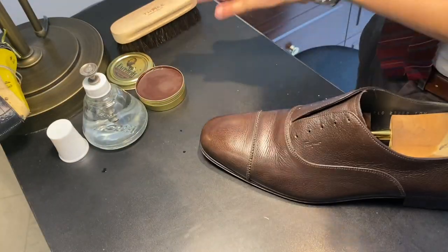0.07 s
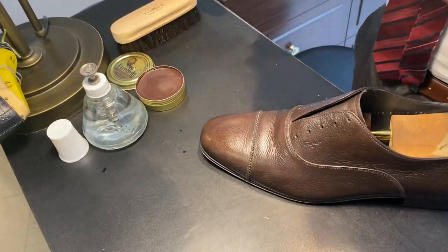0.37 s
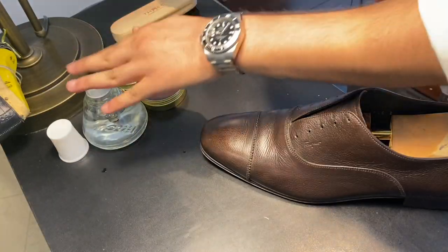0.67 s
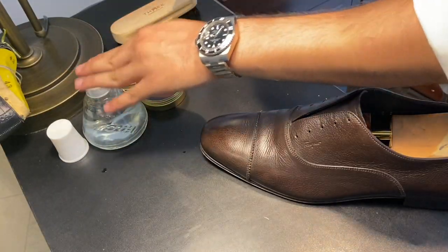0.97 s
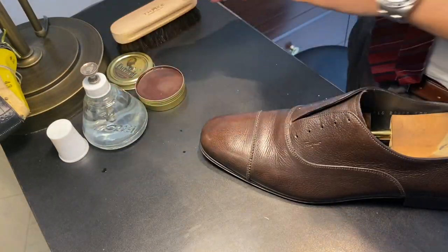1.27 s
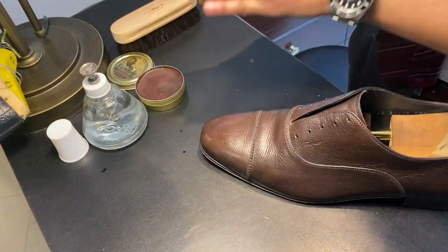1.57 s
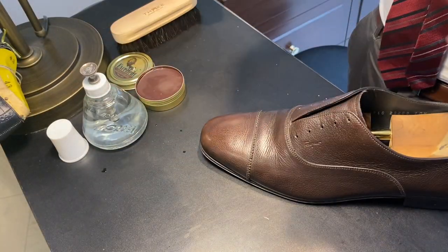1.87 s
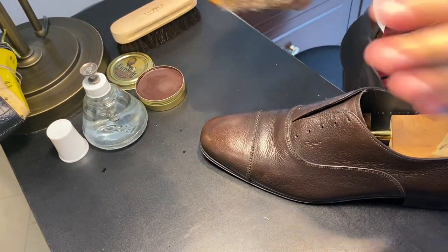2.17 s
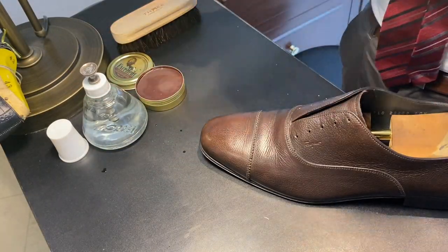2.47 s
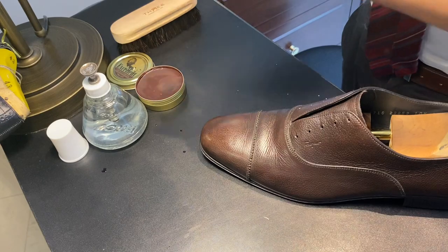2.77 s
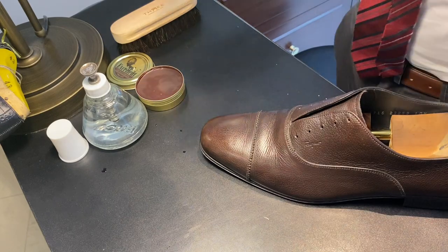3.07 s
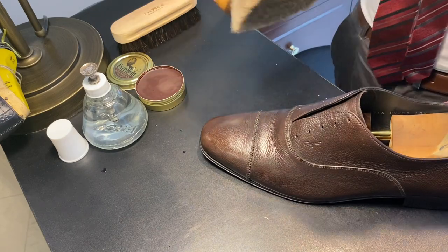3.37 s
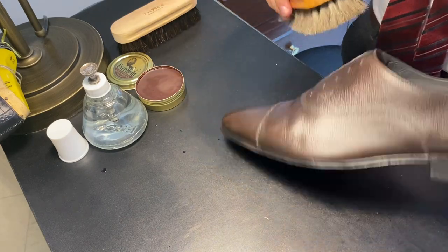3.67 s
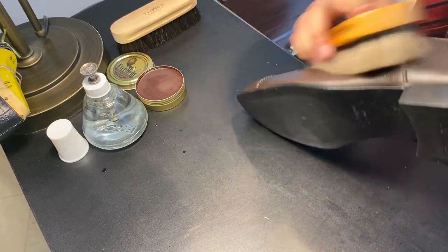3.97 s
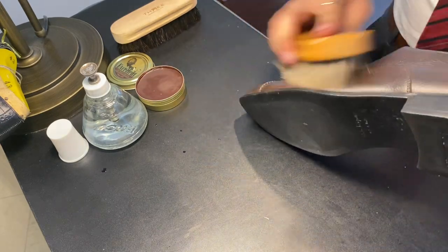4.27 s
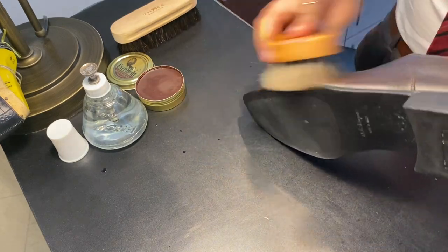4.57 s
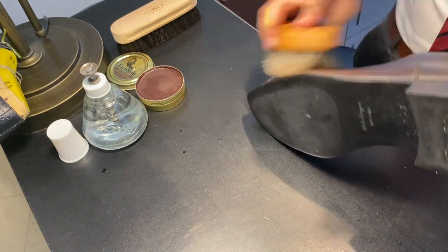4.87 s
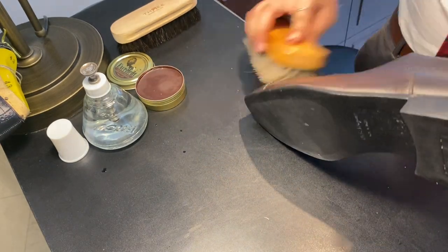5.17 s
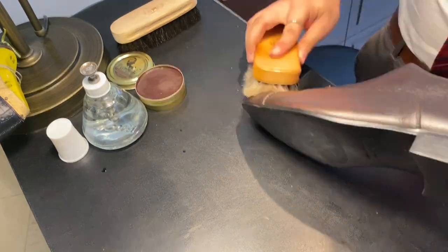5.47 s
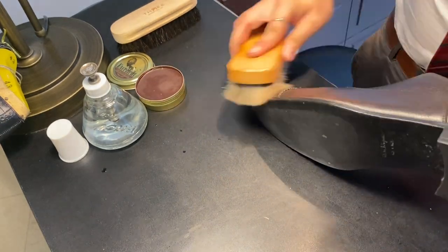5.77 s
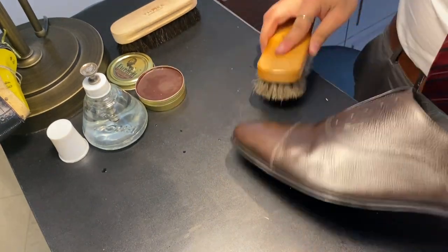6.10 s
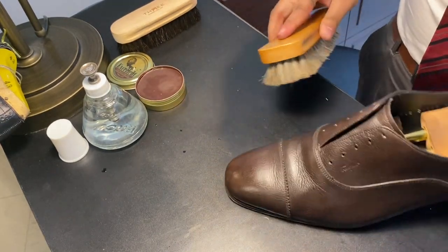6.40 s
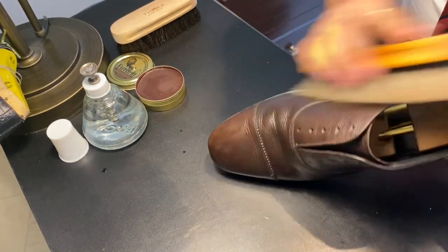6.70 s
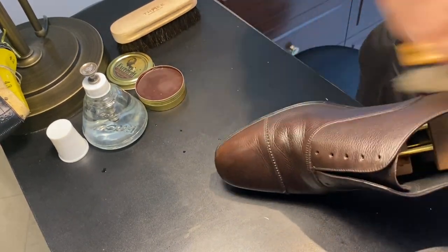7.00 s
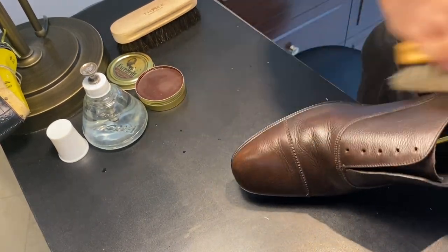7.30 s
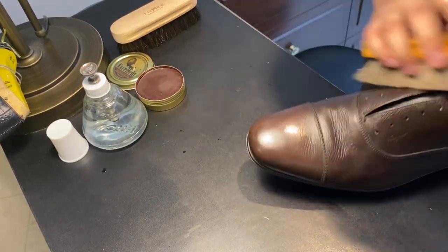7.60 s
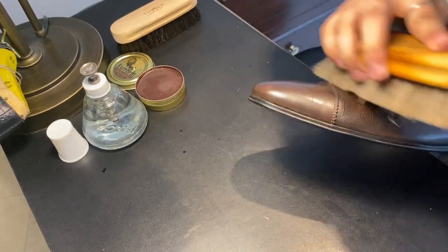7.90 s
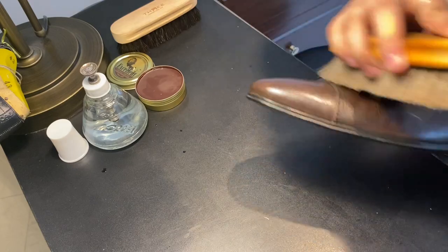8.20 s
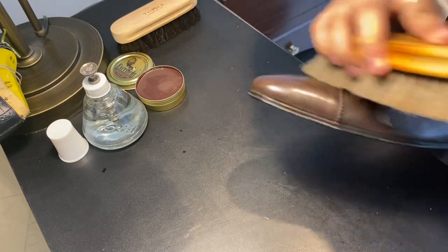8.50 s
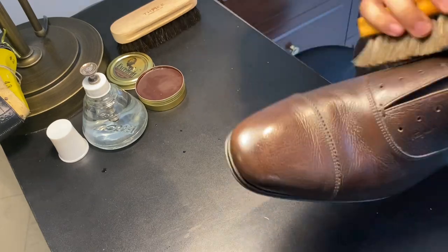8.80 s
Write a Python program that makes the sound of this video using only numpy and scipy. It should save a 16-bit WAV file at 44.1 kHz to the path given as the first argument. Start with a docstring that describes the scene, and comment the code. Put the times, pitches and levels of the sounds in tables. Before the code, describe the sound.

Over a low ventilation hum in a small shop, fingers faintly wipe bristles and a glass pump bottle ticks, clacks and gives one tiny squirt. Something hard slides softly and a wooden brush handle clacks. Then the brush sweeps quickly to and fro over a leather shoe, hissing and bumping hollowly. The shoe knocks down on the table and a second bout of brushing follows, all close to the microphone.

```python
"""A leather shoe is polished at a work table in a small humming shop, close to a two-port microphone.
Fingers wipe a bristle brush, a glass pump bottle ticks and squirts once, and the water is wiped in.
Something hard slides and rings as the brush is fetched, and its wooden handle clacks. From 4 s the
brush sweeps to and fro, six or seven strokes a second, hissing on the leather and bumping the hollow
shoe. Near 6.5 s the shoe is set down and turned; a second bout works over the vamp and the toe cap."""
import sys
import numpy as np
from scipy import signal
from scipy.fft import rfft, irfft, next_fast_len
from scipy.io import wavfile
from scipy.ndimage import uniform_filter1d, map_coordinates

SR = 44100
rng = np.random.default_rng(int(sys.argv[2]) if len(sys.argv) > 2 else 0)


def materialize(psi):
    """Save the field psi as 16-bit PCM at rate SR to the path in sys.argv[1].

    A 1-D psi becomes a single channel; in a 2-D psi each row is a channel.
    """
    bounded = np.clip(np.atleast_2d(psi).T, -1, 1)
    quanta = np.round(bounded * 32767).astype(np.int16)
    wavfile.write(sys.argv[1], SR, quanta)


N = 390285

# stereo width of the background and reverb, narrowed near 7 and 14 kHz: f/Hz, 0 wide to 1 mono
BACKGROUND_STEREO = [(180, 1), (380, 0.86), (700, 0.18), (1300, 0.4), (4400, 0.26), (6600, 0.58), (7000, 1),
                     (7600, 1), (9000, 0.9), (12000, 0.8), (13200, 0.6), (14000, 1), (15500, .7)]
# brush strokes, one sweep of the hand each: t/s, length/s, hiss level/dB, scrub re hiss/dB
STROKES = [(3.969, 0.053, -25.5, -13.5), (4.117, 0.087, -26, -15.5), (4.268, 0.09, -27.5, -13),
           (4.43, 0.082, -26, -15), (4.574, 0.09, -29, -11), (4.739, 0.092, -26.5, -16),
           (4.885, 0.092, -29, -13.5), (5.046, 0.11, -26.5, -15), (5.21, 0.087, -26, -15.5),
           (5.373, 0.1, -24, -17.5), (5.529, 0.087, -26, -16), (5.701, 0.085, -26.5, -16),
           (5.848, 0.076, -28.5, -15), (5.999, 0.088, -25, -16), (6.665, 0.098, -27.5, -12.5),
           (6.836, 0.077, -23.5, -21), (6.963, 0.063, -24.5, -18), (7.12, 0.078, -22.5, -19.5),
           (7.242, 0.08, -26, -12.5), (7.409, 0.0393, -21, -19), (7.51, 0.063, -27.5, -13.5),
           (7.648, 0.072, -27.5, -17), (7.814, 0.037, -28, -18), (7.968, 0.032, -24, -17.5),
           (8.107, 0.055, -28.5, -19), (8.245, 0.061, -26.5, -12.5), (8.409, 0.054, -28.5, -16),
           (8.532, 0.071, -26.5, -13), (8.734, 0.017, -27.5, -12.5)]
# modes of the hollow shoe on its wooden tree: f/Hz, width/Hz, level/dB
SHOE_MODES = [(159.5, 120, 3.5), (251.5, 92, 0.5), (361, 79, -2), (515, 75, -2.5), (633, 126, -4.5)]


def amp(db):
    """Decibels to gain."""
    return 10 ** (np.asarray(db) / 20)


def unit(x):
    """x at rms 1."""
    return x / np.sqrt(np.mean(x ** 2) + 1e-20)


def clock(samples=N):
    """The time of every sample, in seconds."""
    return np.arange(samples) / SR


def along(points, hz):
    """A curve through (f/Hz, value) points, read at hz on a log axis."""
    f, v = np.transpose(points)
    return np.interp(np.log(hz + 1), np.log(f + 1), v)


def wobble(rate):
    """A smooth random curve, rate knots a second."""
    knots = rng.standard_normal(int(N * rate / SR) + 4)
    return map_coordinates(knots, [np.arange(N) * rate / SR])


def filtered(x, response):
    """x through a complex frequency response."""
    size = next_fast_len(N + SR // 2)
    return irfft(rfft(x, size) * response(np.fft.rfftfreq(size, 1 / SR)), size)[..., :N]


def coloured(x, spectrum):
    """x through an EQ curve (f/Hz, level/dB), at rms 1."""
    return unit(filtered(x, lambda hz: amp(along(spectrum, hz))))


def resonate(x, modes):
    """x through a body's resonances (f/Hz, width/Hz, level/dB), alternating in polarity."""
    return filtered(x, lambda f: sum(
        (-1) ** k * amp(db) * 1j * f * width / (hz * hz - f * f + 1j * f * width)
        for k, (hz, width, db) in enumerate(modes)))


def grains(rate, spread_db):
    """Two streams of tiny random flicks, rate a second, of scattered size."""
    hit = rng.random((2, N)) < rate / SR
    return unit(hit * rng.standard_normal((2, N)) * amp(spread_db * rng.standard_normal((2, N))))


def patchy(x, depth_db):
    """The colour of x drifts in patches as the contact point moves."""
    spectra = signal.stft(x, nperseg=1024)[2]
    patches = uniform_filter1d(rng.standard_normal(spectra.shape[1:]), size=5, axis=0)
    patches = unit(uniform_filter1d(patches, size=6, axis=1))
    return unit(signal.istft(spectra * amp(depth_db * patches), nperseg=1024)[1][:, :N])


def spread(pair, stereo):
    """Two signals mixed as mid and side, the stereo width set by frequency (0 wide to 1 mono)."""
    angle = lambda hz: np.arccos(np.clip(along(stereo, hz), 0, 1)) / 2
    mid, side = filtered(pair, lambda hz: np.array([np.cos(angle(hz)), np.sin(angle(hz))]))
    return np.array([mid + side, mid - side])


def add(track, s, sound):
    """Lay a sound into a track at time s."""
    part = track[..., round(s * SR):][..., :sound.shape[-1]]
    part += sound[..., :part.shape[-1]]


def burst(t60):
    """An impact: two noises dying away together."""
    t = clock(SR // 2)
    return rng.standard_normal((2, len(t))) * amp(-60 * t / t60)


def sweep(t, start, length, rise, fall):
    """The speed of a rubbing movement, 0-1: it builds up, holds and eases off."""
    edge = lambda u: .5 + .5 * np.tanh(u / 2)
    return edge((t - start) / rise) * edge((start + length - t) / fall)


def ventilation(air_db=-37, swell_db=2):
    """A steady bed of rumbling air under a slightly unsteady hum."""
    air_spectrum = [(20, -54), (30, -22), (40, -2), (60, -7), (80, 2), (120, -8), (200, -13.5), (300, -23),
                    (500, -24), (660, -24.5), (800, -31), (980, -30.5), (1500, -39), (3000, -43.5),
                    (5500, -51.5), (10000, -57), (15000, -59.5)]  # moving air: f/Hz, level/dB
    hum_tones = [(59.5, -40), (371.5, -60)]  # mains and fan: f/Hz, level/dB
    air = spread(coloured(rng.standard_normal((2, N)), air_spectrum), BACKGROUND_STEREO)
    hum = sum(amp(db) * np.sqrt(2) * np.sin(2 * np.pi * hz * clock() + 0.72 * wobble(5.6))
              for hz, db in hum_tones)
    return amp(air_db) * air + amp(swell_db * wobble(3.01)) * hum


def finger_wipes():
    """Fingertips flick over the bristles; each wipe starts briskly and trails off."""
    wipes = [(0.01, 0.085, -49), (0.148, 0.096, -49), (1.241, 0.089, -55.5), (1.493, 0.028, -50),
             (1.601, 0.094, -52.5), (1.987, 0.079, -53.5), (2.323, 0.12, -50), (2.553, 0.12, -51),
             (2.822, .04, -62), (3.544, 0.11, -62.5), (3.85, 0.078, -61), (6.115, 0.11, -59)]  # fingers wipe or shift: t/s, length/s, level/dB
    flick_spectrum = [(900, -12), (1600, -1), (2400, 9), (3500, 2.5), (5300, 4), (7000, 5.5), (9500, 3),
                      (12500, 2.5), (14500, 6), (15700, -2.5)]  # fingertips on wet bristles: f/Hz, level/dB
    level = sum(amp(db) * sweep(clock(), s, length, rise=0.0071, fall=0.019) for s, length, db in wipes)
    return level * coloured(grains(rate=11000, spread_db=-2.0), flick_spectrum)


def whistles():
    """Thin, slightly wavering tones come and go in the background."""
    tones = [(.27, .38, -68, 3128), (.38, .2, -74, 4689), (2.97, .53, -69.5, 3128), (6.48, .16, -63, 3128)]  # faint high whistles: t/s, length/s, level/dB, f/Hz
    t = clock()
    return sum(amp(db) * sweep(t, s, length, rise=.015, fall=.015)
               * np.sin(2 * np.pi * hz * t + 0.56 * wobble(40)) for s, length, db, hz in tones)


def bottle_ticks(crack_db=-2, chatter_db=-22):
    """Glass and metal are handled: a dry bright crack, a short chatter and a thin glassy ring."""
    touches = [(0.69, -30, -55), (0.7264, -20, -50), (.849, -34, -50), (.8656, -35, -76),
               (0.9248, -16.5, -50), (0.999, -38, -56), (1.004, -30, -55), (1.043, -26.5, -62),
               (1.057, -32, -59), (1.8705, -31.5, -63), (1.945, -37, -65), (1.9753, -40, -66),
               (2.782, -56, -73), (2.937, -50, -71), (3.4185, -43, -70), (3.659, -33, -77),
               (6.513, -39, -78)]  # hard little contacts: t/s, crack level/dB, ring level/dB
    glass_modes = [(3080, -13, .15), (3965, -3, .06), (4700, -8, .07), (6745, -7, .09), (8780, -16, .08),
                   (9490, -1, .16), (9948, -14, .1), (11700, -11, .07)]  # bottle and steel cap, damped by the hand: f/Hz, level/dB, t60/s
    crack_modes = [(4300, 1330, -1), (5150, 1400, 2), (8400, 4300, 1), (15400, 880, -8)]
    cracks, rings, t = np.zeros((2, N)), np.zeros(N), clock(SR // 2)
    for s, db, ring_db in touches:
        crack, chatter = burst(t60=.01), burst(t60=.12)
        add(cracks, s, amp(db + crack_db) * (crack + amp(chatter_db) * chatter))
        # every touch excites the modes at new strengths and detunes them a little
        ring = sum(amp(level + rng.normal(0, 2) - 60 * t / t60)
                   * np.sin(2 * np.pi * hz * rng.normal(1, .003) * t) for hz, level, t60 in glass_modes)
        add(rings, s, amp(ring_db) * ring)
    rattle = unit(1 + .45 * wobble(260))  # the fingers break up the ring
    return rattle * rings + resonate(cracks, crack_modes)


def knocks(clack_gain_db=9):
    """Bottle and shoe knock and the table is jolted: a woody clack over a short hollow thud."""
    hits = [(.907, -34, 520, -63), (0.975, -38, 524, -44.5), (.985, -20, 516, -59), (1.056, -41, 520, -70),
            (3.225, -27, 65, -80), (4.192, -26.5, 84, -73), (4.29, -24, 75, -78), (5.053, -25, 80, -71),
            (5.472, -24, 89.5, -72), (6.255, -48, 553, -47), (6.267, -30, 110, -40.5),
            (6.323, -32, 81.5, -35.5), (6.513, -40, 384, -51), (8.675, -25, 71, -79)]  # blunt contacts: t/s, thud level/dB, thud f/Hz, clack level/dB
    partials = [(1, 0, 1), (.8, -5, .55), (1.58, -12, .5)]  # the thud through the table: pitch ratio, level/dB, share of decay time
    wood_modes = [(1270, 290, 4), (2350, 480, 3), (3400, 470, -7), (5640, 2300, 1), (7800, 3600, -5.5)]  # struck wood and sole: f/Hz, width/Hz, level/dB
    thuds, clacks, t = np.zeros(N), np.zeros((2, N)), clock(SR // 2)
    for s, thud_db, hz, clack_db in hits:
        t60 = 0.046 * (500 / hz) ** 0.9  # lower thuds last longer
        ring = sum(amp(level - 60 * t / (share * t60)) * np.sin(2 * np.pi * ratio * hz * t)
                   for ratio, level, share in partials)
        add(thuds, s, amp(thud_db) * (1 - np.exp(-t / 0.001)) * ring)
        add(clacks, s, amp(clack_db + clack_gain_db) * burst(t60=0.034))
    return thuds + resonate(clacks, wood_modes)


def pump_squirt():
    """Water squeaks through the pump's narrow valve."""
    squirt = [(1.028, -42.5, 5200, 0.005)]  # one press of the pump: t/s, level/dB, f/Hz, half length/s
    t = clock()
    return sum(amp(db) * np.exp(-((t - s) / half) ** 2) * np.sin(2 * np.pi * hz * t + 2 * wobble(700))
               for s, db, hz, half in squirt)


def ringing_slides():
    """Something hard slides softly; the light friction sets a few narrow resonances singing."""
    slides = [(2.294, 0.072, -56), (2.748, 0.065, -57), (3.187, .1, -54), (3.328, 0.31, -61.5)]  # movements as the brush is fetched: t/s, length/s, level/dB
    ring_modes = [(2060, 310, 1.5), (3400, 310, -8), (3960, 140, 0.5), (4930, 180, -2.5), (5450, 520, -9),
                  (8240, 250, -7), (10500, 1600, -21)]  # the sliding object: f/Hz, width/Hz, level/dB
    level = sum(amp(db) * sweep(clock(), s, length, rise=0.02, fall=.025) for s, length, db in slides)
    return level * unit(resonate(grains(rate=4400, spread_db=1.0), ring_modes))


def handle_taps(clack_gain_db=9):
    """The hard wooden brush handle gives a short, dry clack as it is picked up."""
    taps = [(3.5203, -37), (3.5265, -42), (3.5303, -34)]  # contacts of the handle: t/s, level/dB
    handle_modes = [(1450, 250, -7), (1927, 220, 7), (2756, 350, -4), (3400, 450, 0), (3801, 300, -4),
                    (5500, 2500, -15)]  # its wood: f/Hz, width/Hz, level/dB
    cracks = np.zeros((2, N))
    for s, db in taps:
        add(cracks, s, amp(db + clack_gain_db) * burst(t60=.025))
    return resonate(cracks, handle_modes)


def bristle_contact(rise_s=0.0099, fall_s=0.012, grip_power=0.55, landing_scrub_db=-14.5):
    """Envelopes of the bristles' hiss and drag; all strokes and landings add in power."""
    landings = [(3.927, -35), (7.792, -24.5), (8.088, -28), (8.706, -26)]  # the lifted brush comes down, already moving: t/s, hiss level/dB
    t = clock(SR)
    hiss, drag = np.zeros((2, N))
    for s, length, db, scrub_db in STROKES:
        # half a second of pre-roll leaves room for the swell
        speed = sweep(t, 0.4975, length, rise_s, fall_s)
        add(hiss, s - .5, (amp(db) * speed) ** 2)
        # the bristles press and drag before they reach full speed
        pressure = sweep(t + 0.69 * rise_s, 0.4975, length, rise_s, fall_s) ** grip_power
        add(drag, s - .5, (amp(db + scrub_db) * pressure) ** 2)
    splay = (1 - np.exp(-t / 0.005)) * amp(-60 * t / 0.4)  # landing bristles splay, then settle
    for s, db in landings:
        add(hiss, s, (amp(db) * splay) ** 2)
        add(drag, s, (amp(db + landing_scrub_db) * splay ** grip_power) ** 2)
    return np.sqrt([hiss, drag])


def leather(x, drift_db):
    """x through the upper: each resonance follows the part being brushed, and waxes and wanes."""
    # the leather upper: f/Hz, width/Hz, level/dB on the side, on the vamp, on the toe cap
    upper_modes = [(648, 52, -3.5, 0, -1.5), (788, 59, -4.5, -2.5, -3), (982, 64, 2, -0.5, -1),
                   (1102, 97, -2, -4, -3.5), (1333, 206, -2, -5, -5), (1570, 220, -1, -5, -4),
                   (1970, 340, -2.5, -4, -3.5), (2320, 280, -1.5, -3, -1.5), (2680, 360, -3.5, -5.5, -3),
                   (3300, 340, -3, -8.5, -8), (3650, 500, -5.5, -8.5, -9), (5400, 850, -5.5, -8.5, -11.5)]
    route_s = [6.2, 6.6, 7.6, 7.75]  # the brush leaves the side, works the vamp, reaches the toe
    out = np.zeros((2, N))
    for k, (hz, width, side, vamp, toe) in enumerate(upper_modes):
        level_db = np.interp(clock(), route_s, [side, vamp, vamp, toe])
        out += (-1) ** k * amp(level_db + drift_db * wobble(11)) * resonate(x, [(hz, width, 0)])
    return out


def brush_strokes(hiss_db=-1, scrub_db=-2, hollow_db=-7, shake_db=1):
    """Bristle tips flick over the grain; their drag sounds the leather and the hollow shoe."""
    bristle_spectrum = [(1000, -35), (3000, -17), (4200, -13), (5300, -10), (6300, -7.5), (7200, -5.5),
                        (8200, -2.5), (9400, 0), (12000, -.1), (15700, .4)]  # hiss of the tips: f/Hz, level/dB
    sheen_ride = [(4.1, 2.5), (4.9, 3.5), (5.4, -4.5), (5.58, 4), (6.1, 2), (6.7, -3.5), (7.8, -4),
                  (8.4, 0)]  # the finest hiss as the shoe is tilted and turned: t/s, level/dB
    hiss, drag = bristle_contact()
    tips = coloured(patchy(rng.standard_normal((2, N)), depth_db=.6), bristle_spectrum)
    # the angle of the brush decides how much of the finest hiss comes through
    sheen = filtered(tips, lambda hz: along([(11000, 0), (13800, 1)], hz))
    sheen_gain = amp(np.interp(clock(), *np.transpose(sheen_ride)))
    swish = hiss * (tips - sheen + sheen_gain * sheen)
    rasp = patchy(leather(grains(rate=3000, spread_db=3.2), drift_db=1.5), depth_db=2.1)
    tufts = amp(1.06 * wobble(130))  # bristles catch and let go in tufts
    hollow = unit(resonate(grains(rate=1500, spread_db=1), SHOE_MODES))
    # each stroke also shakes the whole shoe against the hand and table
    shake_spectrum = [(40, -40), (70, 6.5), (95, 5.5), (130, -38), (250, -52), (1000, -87)]
    shake = coloured(rng.standard_normal((2, N)), shake_spectrum)
    body = drag * (amp(hollow_db) * hollow + amp(shake_db) * shake)
    return tufts * (amp(hiss_db) * swish + amp(scrub_db) * drag * rasp) + body


def brush_bumps(thump_db=-2, slap_db=5, coarse_db=3, thump_focus_db=6, slap_focus_db=2.5):
    """The brush bumps the shoe: the hollow rings briefly under a coarse slap of bristles."""
    blows = [(3.951, -25, -1.5, 260), (4.103, -26.5, -3, 367), (4.262, -28, -17, 306), (4.428, -30, 1, 397),
             (4.729, -28.5, -12, 239), (4.82, -30.5, -1, 300), (5.048, -30.5, -17, 332),
             (5.141, -27, -7, 220), (5.394, -31, -19, 300), (5.47, -27, -6, 159), (5.684, -29.5, -10, 420),
             (5.985, -26, -5, 201), (5.999, -27.5, -5, 330), (6.053, -30, -19, 350),
             (6.646, -32.5, -10, 300), (6.688, -24, -10, 150), (6.704, -31, 0, 680), (6.72, -26, -11, 150),
             (6.731, -36.5, 5.5, 1020), (6.883, -25, 0, 450), (6.897, -26.5, -13, 199),
             (6.953, -28.5, -9, 189), (6.994, -35, 6.5, 1410), (7.158, -25, 1, 400),
             (7.172, -25.5, -2, 260), (7.241, -31.5, -2, 400), (7.29, -37, 5, 1000), (7.423, -28, -.5, 440),
             (7.451, -28, -4, 400), (7.829, -31.5, -14, 190), (7.957, -30, -5, 380),
             (8.251, -34.5, 1.5, 480), (8.535, -32.5, -19, 500), (8.63, -47, 6, 500),
             (8.725, -32.5, -6, 357)]  # brush against shoe: t/s, level/dB, relative slap level/dB, favoured f/Hz
    slap_modes = [(500, 140, 0), (1023, 180, 3.5), (1380, 350, 0), (2020, 500, 0.5), (3800, 1900, -7)]  # bristles slapping the hollow upper: f/Hz, width/Hz, level/dB
    thumps, slaps, t = np.zeros(N), np.zeros((len(slap_modes), 2, N)), clock(SR // 2)
    # every stroke also lands one light blow somewhere on its way
    nudges = [(s + length * rng.random(), -36, -13, 300) for s, length, *_ in STROKES]
    for s, db, slap_rel_db, spot_hz in blows + nudges:
        tuning = 2 ** (0.089 * rng.standard_normal())  # the grip shifts the modes from blow to blow
        ring = np.zeros(len(t))
        for hz, width, level in SHOE_MODES:
            # each spot favours a pitch; a mode an octave away is weaker by the focus
            mode_db = level - thump_focus_db * np.log2(hz / spot_hz) ** 2 + rng.normal(0, 1.4)
            decay = np.exp(-np.pi * width * t / 2)
            ring += amp(mode_db) * decay * np.sin(2 * np.pi * (tuning * hz * t + rng.random()))
        add(thumps, s, amp(db + thump_db) * (1 - np.exp(-t / 0.0021)) * ring)
        slap = amp(db + slap_rel_db + slap_db) * burst(t60=0.125)
        for track, (hz, *_) in zip(slaps, slap_modes):
            add(track, s, amp(-slap_focus_db * abs(np.log2(hz / spot_hz))) * slap)
    tufts = unit(amp(coarse_db * wobble(600)))  # the bristles hit in separate tufts
    return thumps + sum((-1) ** k * resonate(tufts * slaps[k], [mode])
                        for k, mode in enumerate(slap_modes))


def shoe_set_down(start_s=6.5, peak_db=-24, edge_hz=900.5, flat_hz=110, flatten_s=0.0044, load_s=.0085):
    """The edge of the sole lands first, then its whole face: one compact knock of falling pitch."""
    t = np.maximum(clock() - start_s, 0)
    pitch = flat_hz + (edge_hz - flat_hz) * np.exp(-t / flatten_s)
    load = (t / load_s * np.exp(1 - t / load_s)) ** 2  # the weight arrives on the table
    return amp(peak_db) * load * np.sin(2 * np.pi * np.cumsum(pitch) / SR)


def shop_reverb(x):
    """The small shop's short, diffuse tail, the highs dying first."""
    decay_times = [(200, 0.63), (2000, 0.39), (12000, 0.22)]  # the shop's reverberation: f/Hz, t60/s
    return_eq = [(400, 4.4), (1500, 6.4), (5000, 7.2), (8000, 3.7)]  # f/Hz, level/dB
    hz, t, spectra = signal.stft(rng.standard_normal((2, SR // 2)), SR, nperseg=256)
    decay = amp(-60 * t / along(decay_times, hz)[:, None])
    tail = signal.istft(spectra * decay, SR, nperseg=256)[1]
    wet = signal.fftconvolve(x, tail / np.linalg.norm(tail[0]), axes=1)[:, :N]
    return spread(filtered(wet, lambda f: amp(along(return_eq, f))), BACKGROUND_STEREO)


def scene(reverb_send_db=-15):
    """Close sounds on the table, the shop's reverb and the ventilation bed."""
    # stereo width of the close sounds, narrowed near 7 kHz: f/Hz, 0 wide to 1 mono
    close_stereo = [(120, 1), (250, 1), (500, 0.83), (850, 0.54), (1800, 1), (2800, 0.43), (4500, 0.8),
                    (5300, 0.85), (6900, 1), (7600, 1), (9000, 0.76), (12000, 0.95), (13500, 0.89),
                    (15500, 0.96)]
    polishing = brush_strokes() + brush_bumps()
    handling = bottle_ticks() + knocks() + handle_taps() + ringing_slides() + finger_wipes()
    centred = shoe_set_down() + pump_squirt() + whistles()
    near = spread(polishing + handling, close_stereo) + centred
    return near + amp(reverb_send_db) * shop_reverb(near) + ventilation()


def record(dry):
    """The two-port microphone: the left leads in the treble, and the top end falls away steeply."""
    port_phase = [(100, 0), (5400, .1), (6000, 1.6), (6600, 2.75), (7000, 3.1), (7500, 3.2), (8000, 3.7),
                  (9000, 5), (10400, 6.28), (12000, 8.1), (13200, 9.3), (13800, 9.55), (14500, 10.3),
                  (15700, 11.5)]  # phase between the ports: f/Hz, lead of the left/rad
    top_hz = 15700
    ports = lambda hz: np.exp(.5j * np.outer([1, -1], along(port_phase, hz)))
    high_cut = lambda hz: amp(-60 * np.clip((hz - top_hz) / 500, 0, 2) ** 2)
    return filtered(dry, lambda hz: ports(hz) * high_cut(hz))


dry = scene()
out = record(dry)
materialize(out)
```